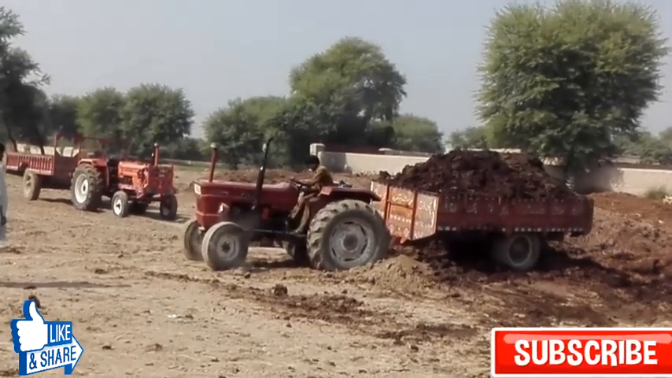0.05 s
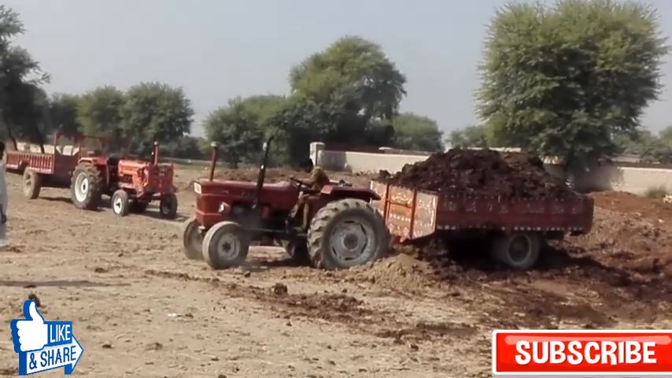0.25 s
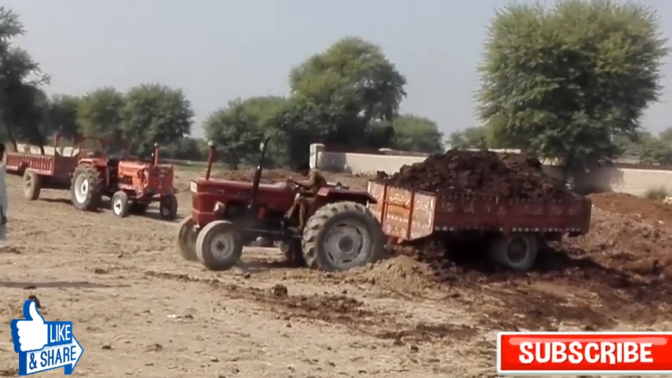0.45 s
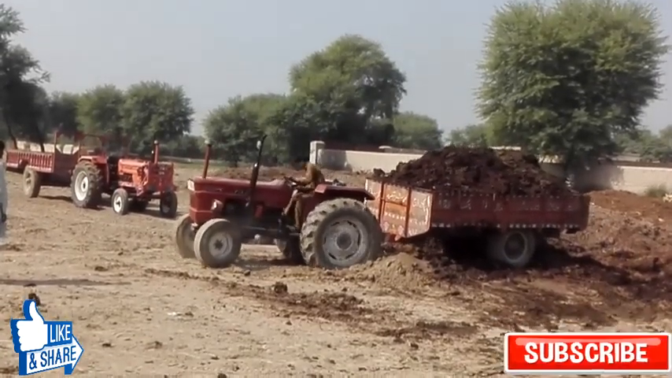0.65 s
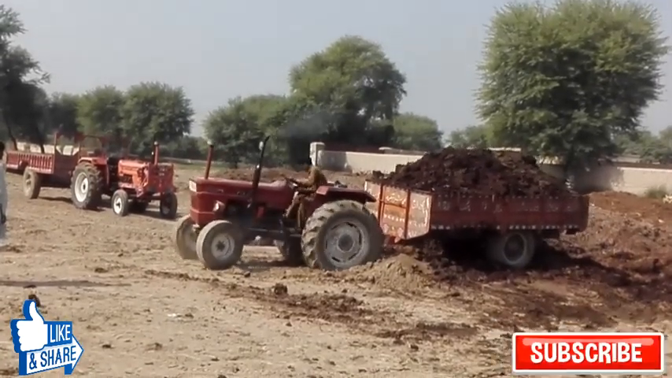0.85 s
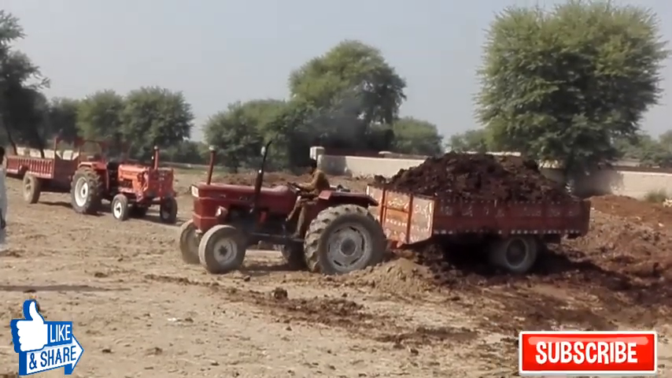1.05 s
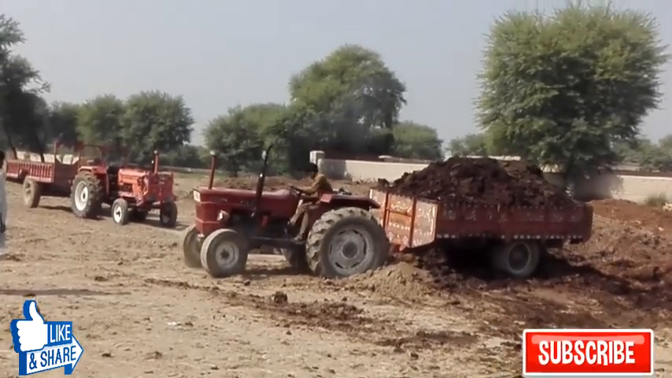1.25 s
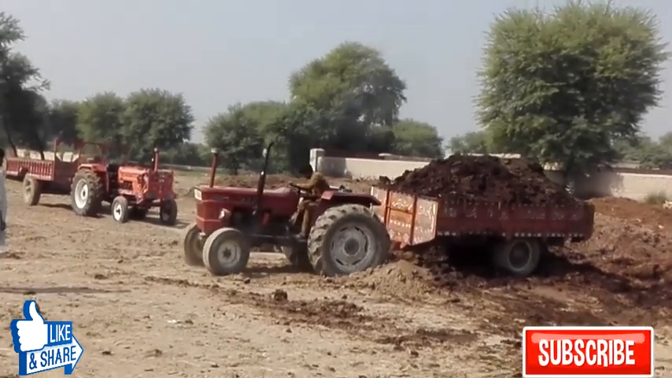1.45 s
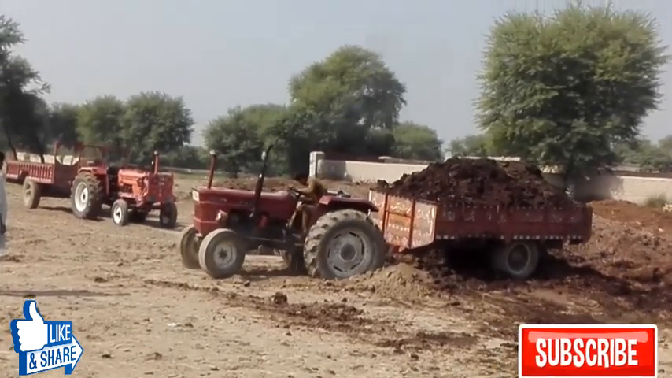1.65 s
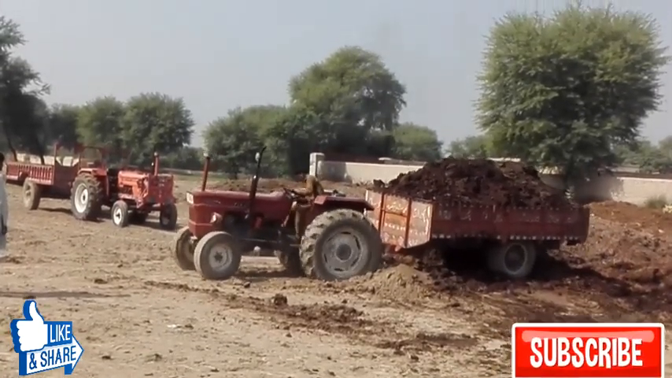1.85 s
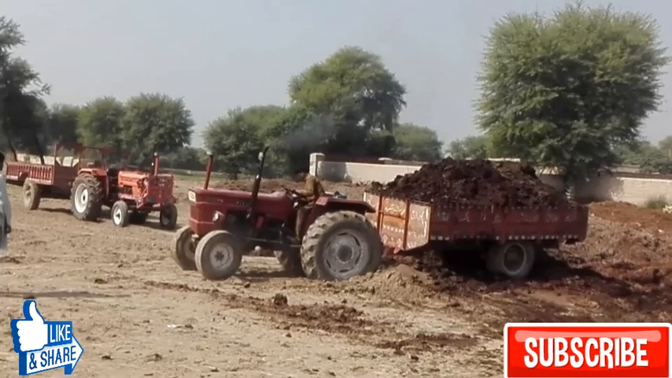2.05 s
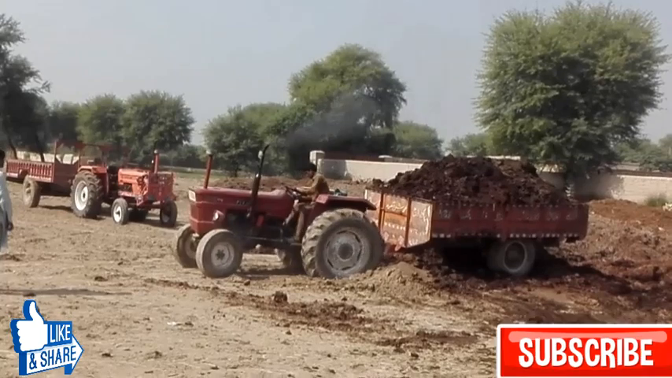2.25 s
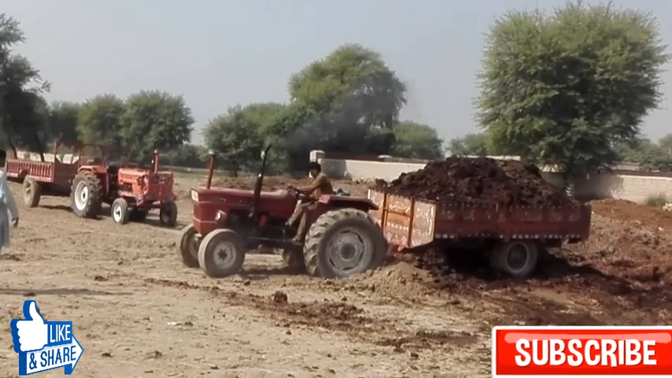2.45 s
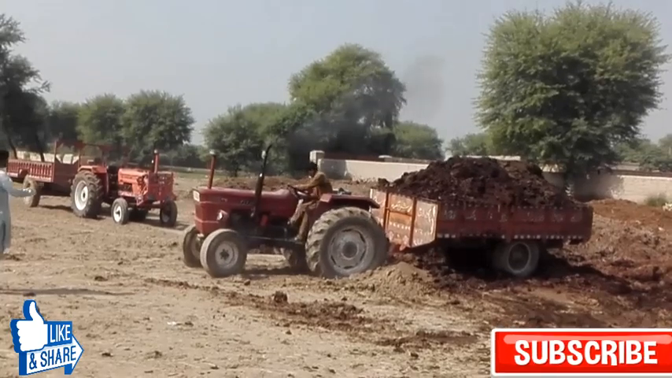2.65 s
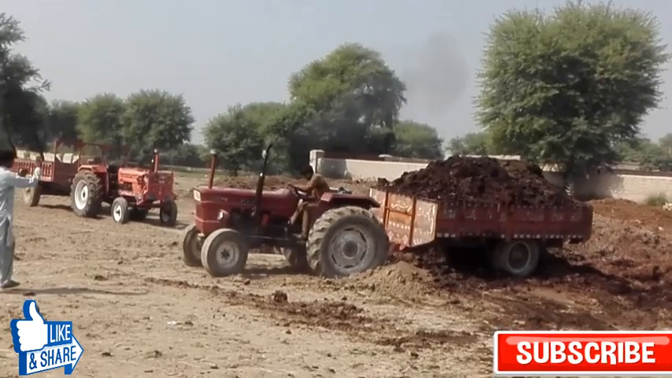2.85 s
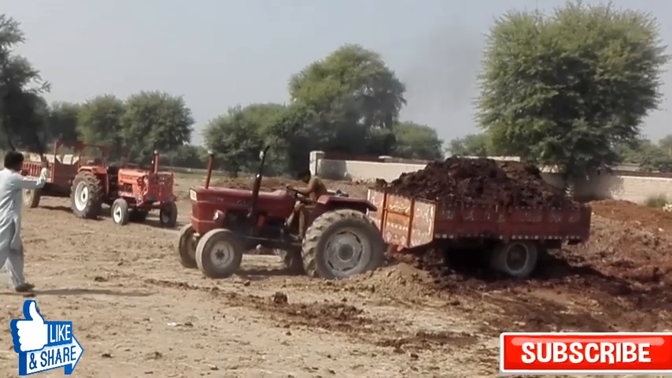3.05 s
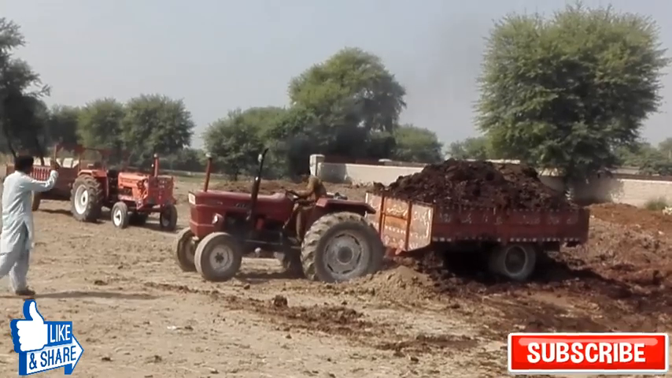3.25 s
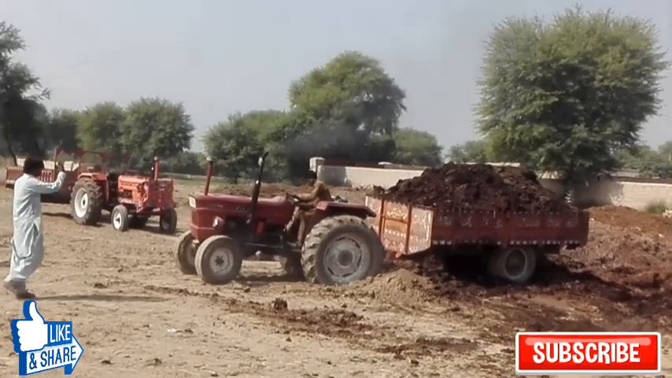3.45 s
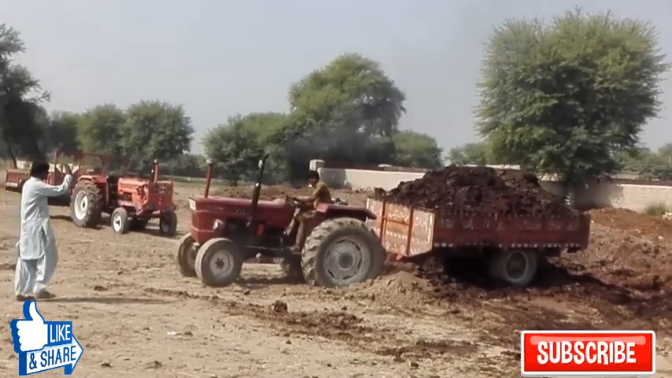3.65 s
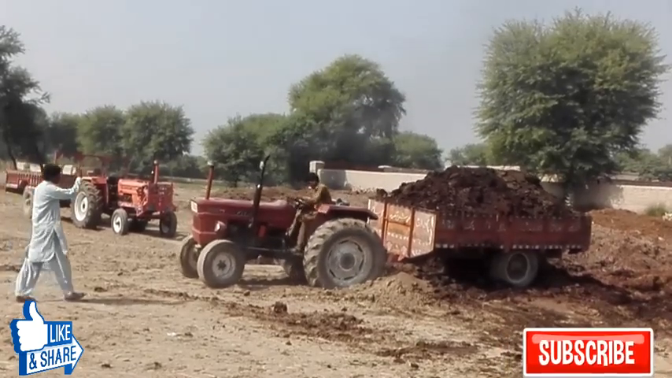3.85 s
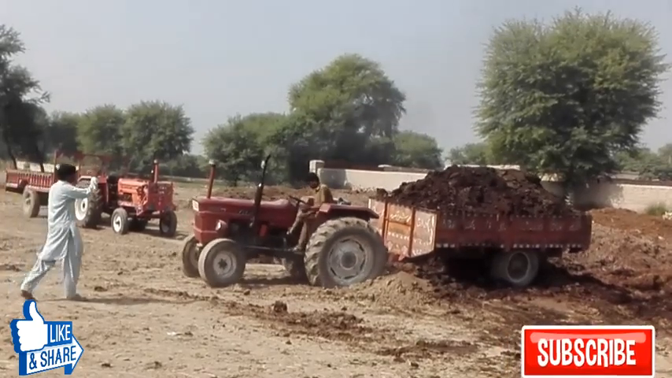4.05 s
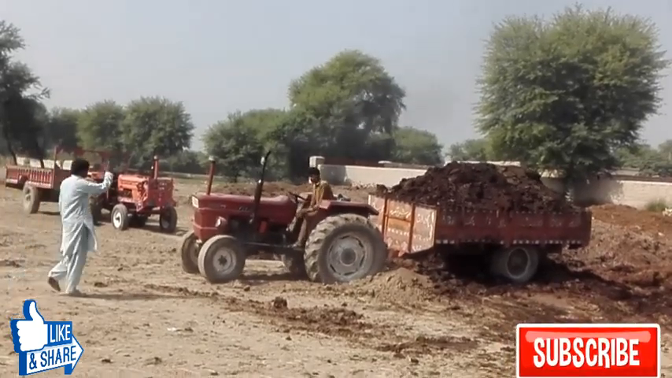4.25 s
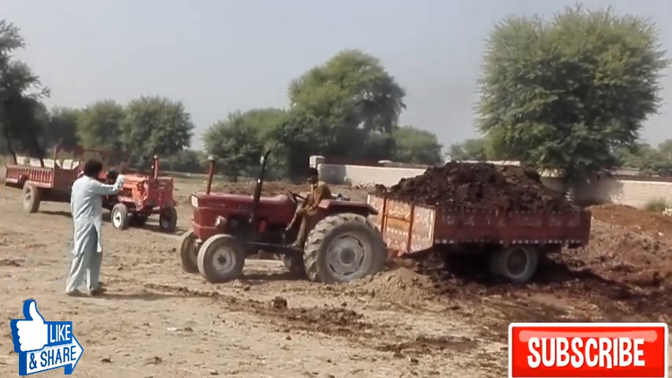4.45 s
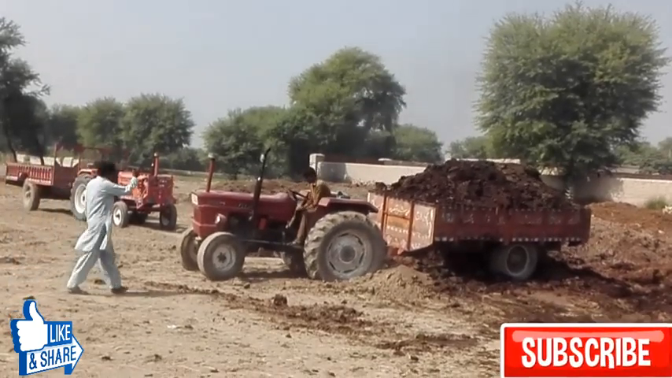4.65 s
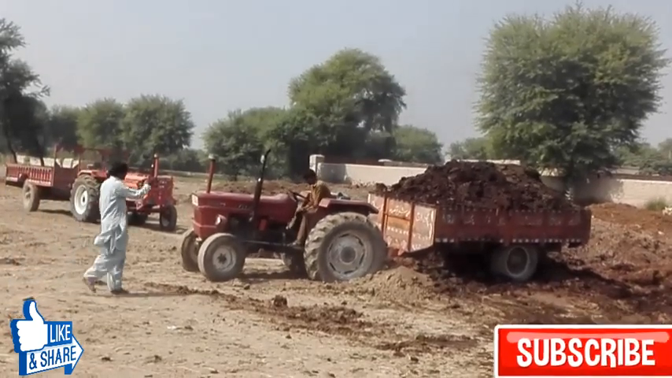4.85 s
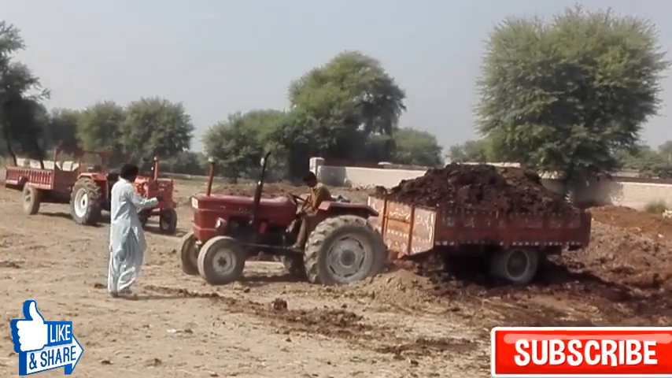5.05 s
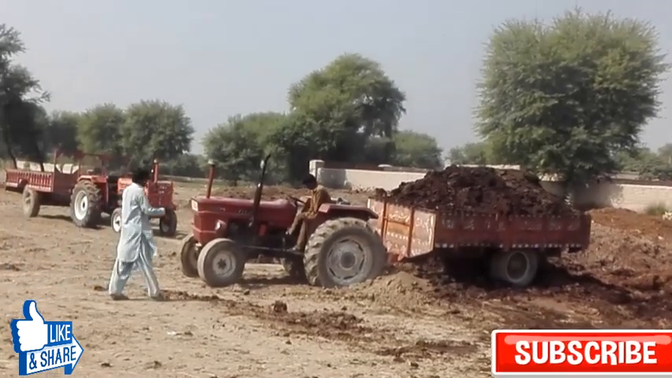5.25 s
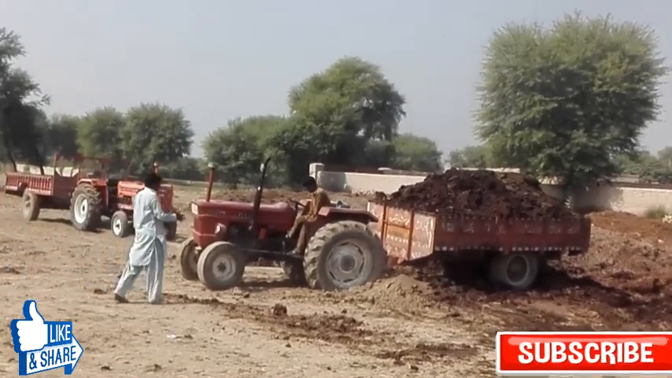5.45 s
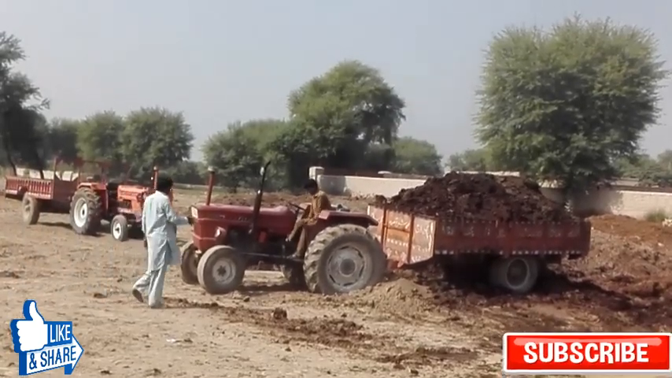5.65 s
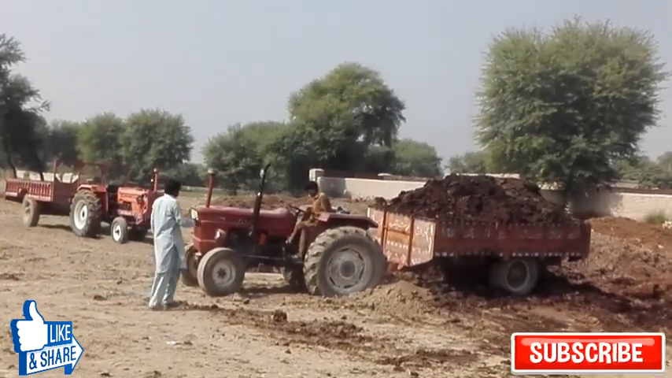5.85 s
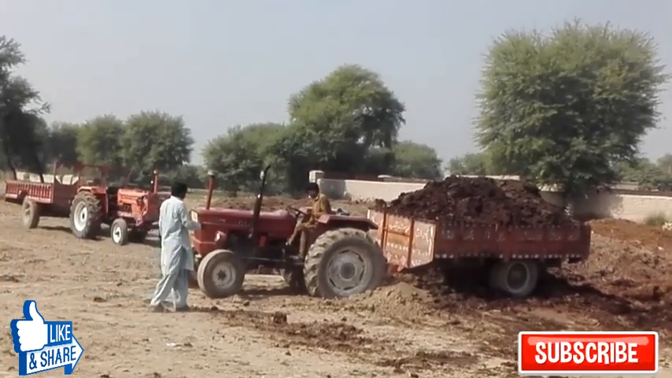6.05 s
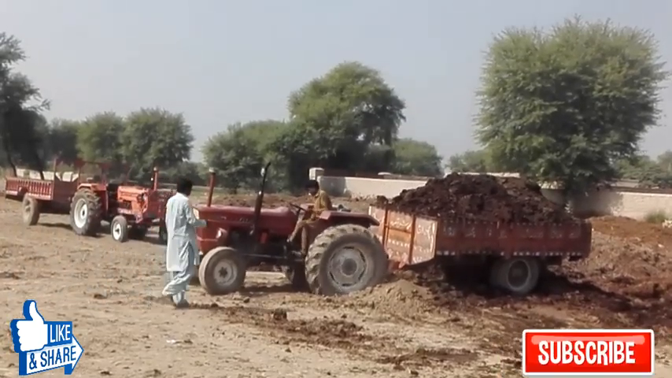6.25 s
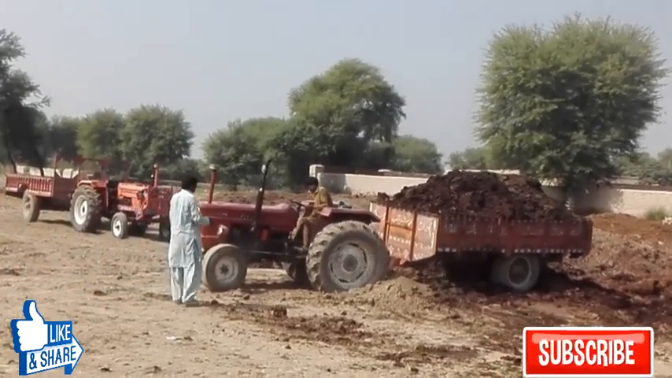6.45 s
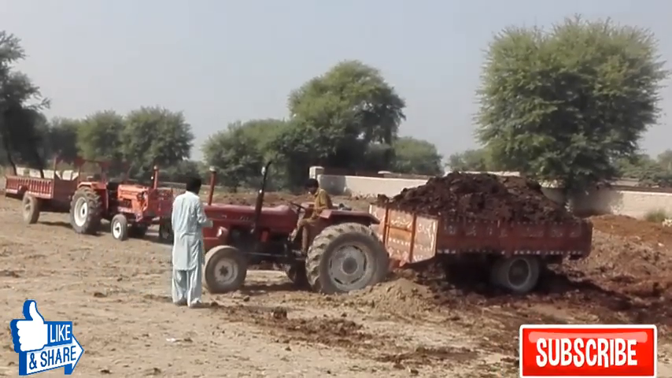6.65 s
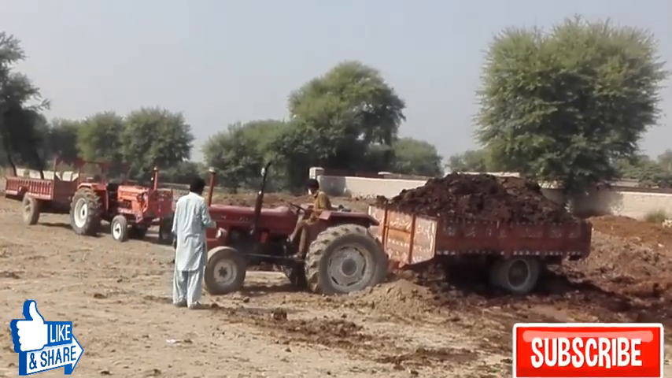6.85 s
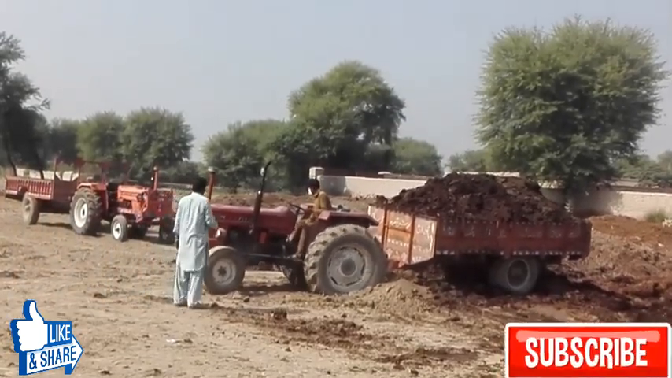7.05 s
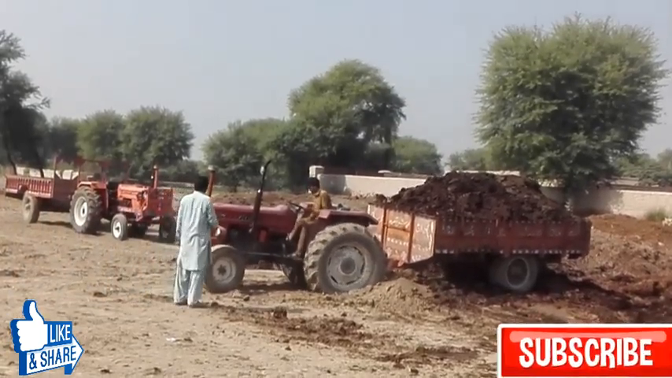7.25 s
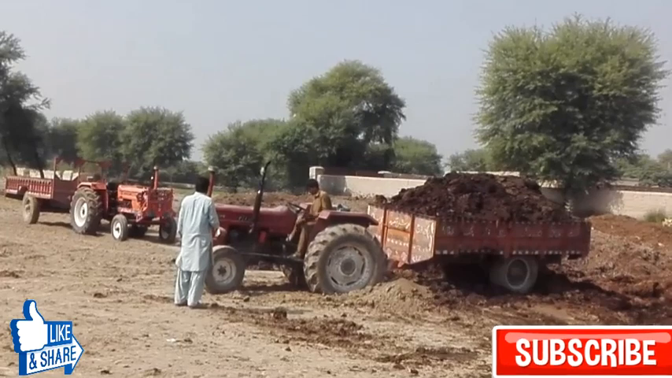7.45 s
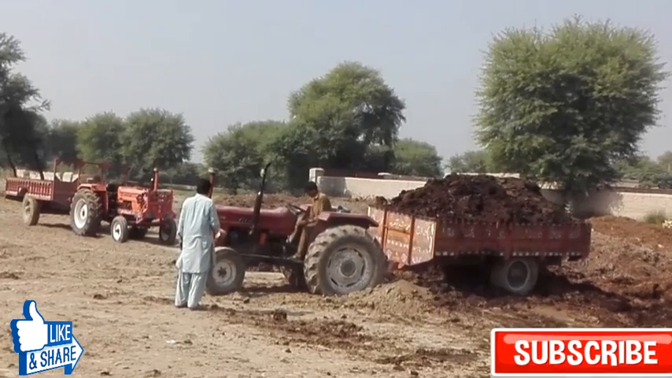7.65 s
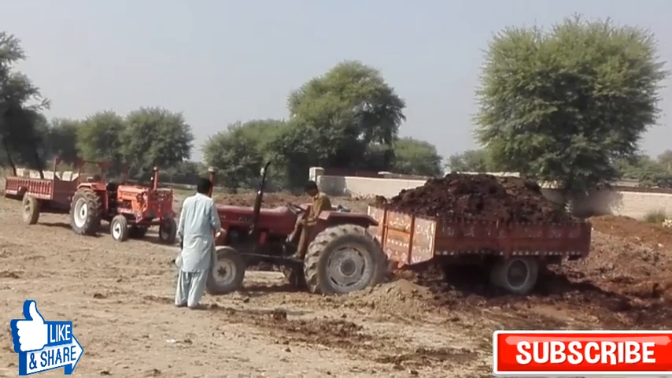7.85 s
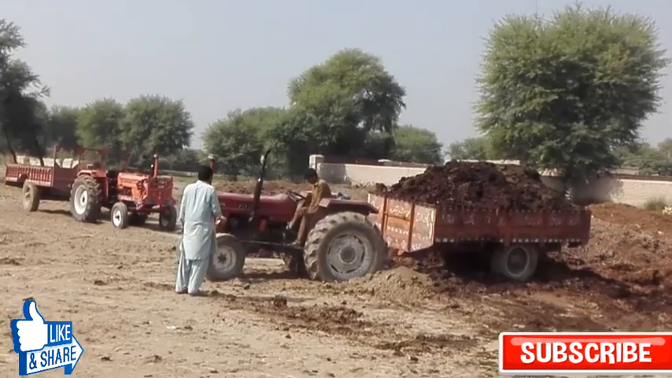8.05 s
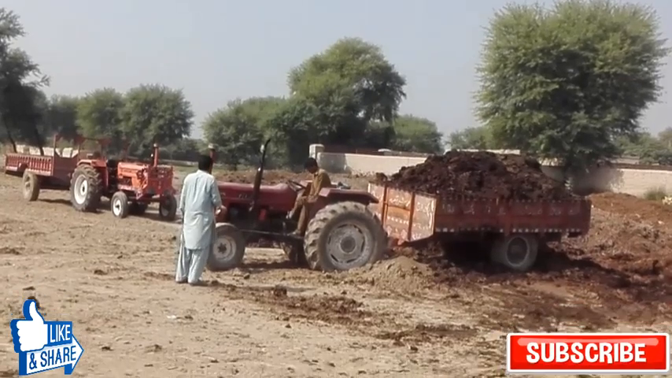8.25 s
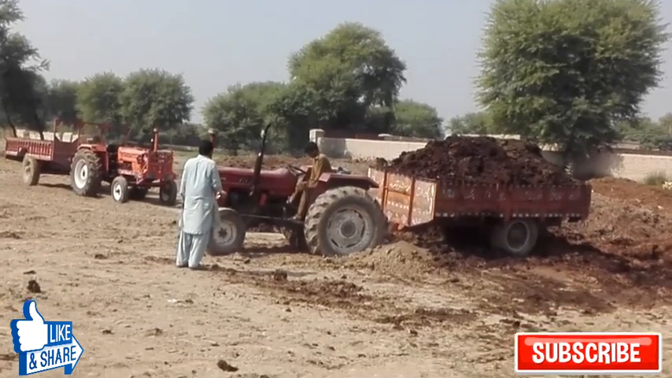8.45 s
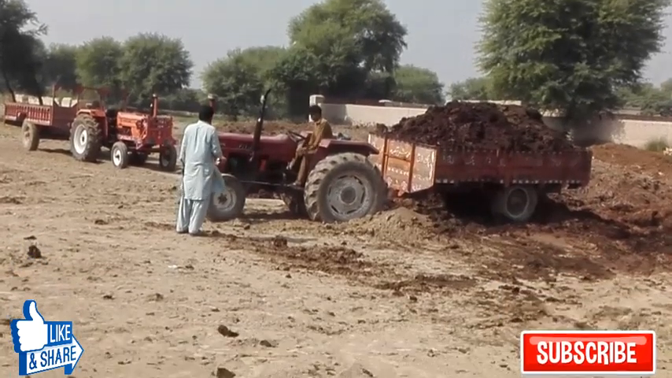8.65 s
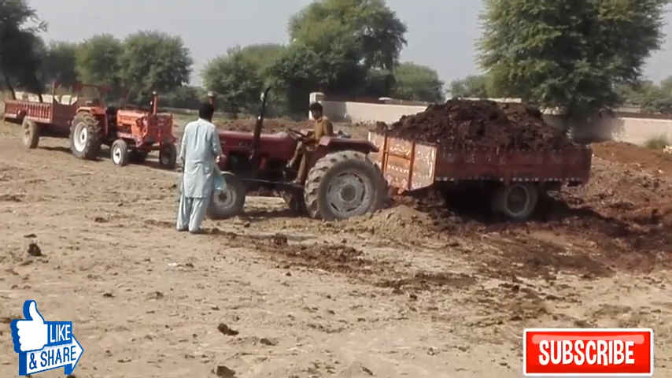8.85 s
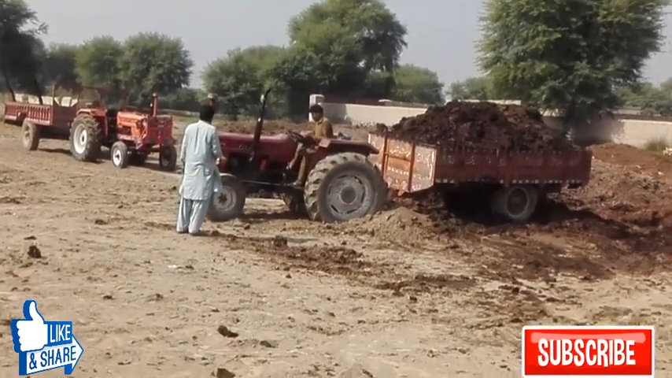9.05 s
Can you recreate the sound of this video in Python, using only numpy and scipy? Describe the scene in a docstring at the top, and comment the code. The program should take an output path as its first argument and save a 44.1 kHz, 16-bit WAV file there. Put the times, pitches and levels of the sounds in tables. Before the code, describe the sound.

A diesel tractor revs hard in repeated surges, its loaded trolley clanking and squeaking, then drops to a knocking idle.

```python
"""A four-cylinder diesel tractor in an open field strains at a loaded trolley stuck in soft ground.
First come three surges of throttle: knock, hiss and rumble grow with speed and fuel, while the
trolley clanks, thuds and squeaks. After each surge the engine slows and the exhaust pipe throbs as
the unfuelled cylinders suck. At about 6 s a fourth pull makes the gearbox whine. Then the engine
sinks to idle, and picks up a little at the end."""
import sys
import numpy as np
from scipy import signal
from scipy.fft import rfft, irfft
from scipy.io import wavfile
from scipy.ndimage import uniform_filter1d

SR = 44100
rng = np.random.default_rng(int(sys.argv[2]) if len(sys.argv) > 2 else 0)


def waveform_to_disk(signal):
    """Save audio, clipped to [-1, 1], as 16-bit WAV at the path in sys.argv[1]."""
    frames = np.transpose(np.atleast_2d(signal))
    scaled = np.clip(frames, -1, 1) * 32767
    samples = np.round(scaled).astype(np.int16)
    wavfile.write(sys.argv[1], SR, samples)


N = 401751
TIME = np.arange(N) / SR
CRUISE_HZ = 60  # firings per second at cruising speed
# How hard the cylinders knock. Each entry: one cylinder's level in dB.
CYLINDER_DB = [1, 0, -1, 0]


def engine(firings, hz, fuel):
    """Valves rattle the engine block; under load each firing barks, and at idle the pistons slap most."""
    # Tone colours of the block, the bark and the pipe's shrill ring. Each row: pitch in Hz, level in dB.
    block_colour = [(400, -23.5), (680, -20), (750, -9.5), (840, -9.5), (1000, -3), (1250, -5.5),
                    (1550, -1.5), (1820, -8), (2450, -3), (3200, -3), (4500, -16.5), (5300, -9.5),
                    (7000, -17.5), (14000, -50.5)]
    bark_colour = [(400, -2), (700, -14), (900, -18.5), (1350, -1), (1800, -10), (2120, -4.5), (2400, -2.5),
                   (3200, -3.5), (4500, -14), (8000, -20.5), (14000, -40)]
    shrill_colour = [(1700, -33), (2060, 1), (2180, 14), (2600, -61.5)]
    # How hard the pistons slap. Each entry: one piston's level in dB.
    piston_db = [0.5, 4, -2.5, 0.5]
    idle_fuel, hard_fuel = 0.119, 0.715  # the bark starts at the first and is full at the second
    load = np.clip((fuel - idle_fuel) / (hard_fuel - idle_fuel), 0, 1)
    idle = np.clip((46 - hz) / 5, 0, 1)
    racing = np.clip((hz - 55) / 20, 0, 1)
    clatter = unit(impacts(firings, count=72, scatter_db=4, slop=0.00296))
    slap_pulse = bursts(firings - .45, hz, piston_db, rise_s=0.00085, decay_s=0.0062, scatter_db=1.85)
    slap = (0.334 + 1.064 * idle) * slap_pulse * noise()
    shake = unit((1 - 0.136 * idle) * (clatter + noise()) + slap) * (1 - 0.616 * load)
    puff = bursts(firings, hz, CYLINDER_DB, rise_s=0.00074, decay_s=0.00746, scatter_db=1.95)
    blast = unit(puff * (noise() + 0.389 * clatter))
    block = undb(-2) * colour(shake, block_colour) + panels(shake + load * blast)
    bark = undb(-2.5) * load * colour(blast, bark_colour)
    whirr = racing * (1 - 0.7 * load) * fan_and_gears(firings)
    shrill = undb(-7.5) * load * racing * colour(blast, shrill_colour)
    knock_gain = effort(hz, fuel, cruise_db=-37, doubling_db=9.51, fuel_db=8.91)
    hiss_gain = effort(hz, fuel, cruise_db=-43, doubling_db=9.93, fuel_db=9.76)
    return knock_gain * (block + bark + whirr + shrill) + hiss_gain * hiss(puff, load, clatter, slap)


def exhaust(firings, hz, fuel):
    """The exhaust pipe throbs at the firing rate; unequal puffs ring it with a lumpy rumble."""
    # Weaker tones; unequal cylinders add the fractions. Each row: multiple of firing rate, level in dB.
    overtones = [(.5, -3), (.75, -29), (1.25, 5), (1.5, 0.5), (1.75, -16.5), (2.25, -35), (2.5, -5.5),
                 (2.75, -0.5), (3, 0.5), (3.75, -3), (4, 2.5), (8, -4)]
    # The pipe's tone colour. Each row: pitch in Hz, level in dB.
    pipe_colour = [(25, -16), (45, -4), (65, -3), (100, 2.5), (138, -3.5), (174, 2), (195, -4), (220, -2.5),
                   (255, -11), (300, -6.5), (400, -14), (550, -22), (630, -21), (900, -27.5), (1500, -47)]
    peak_delay = 0.2798  # the pressure peaks this share of the way to the next firing
    angle = 2 * np.pi * (firings - peak_delay + 0.0026 * wander(40))
    lumps = sum(undb(db + 3.63 * wander(6)) * np.sin(k * angle + 2 * np.pi * rng.random())
                for k, db in overtones)
    gust = unit(noise() * np.exp(-1.8 * (firings % 1)))  # each puff starts rough and eases off
    puffs = unit(impacts(firings, count=48, scatter_db=4, slop=0.0214)) + undb(-3) * gust
    rumble = undb(-4.5) * colour(lumps, pipe_colour) + undb(-1.5) * colour(puffs, pipe_colour)
    rumble_gain = effort(hz, fuel, cruise_db=-28.5, doubling_db=8.3, fuel_db=0.61)
    return throb(angle, hz, fuel) + rumble_gain * rumble


def throb(angle, hz, fuel):
    """Fuelled cylinders blow and unfuelled ones suck, so the throb dips as one gives way to the other."""
    # With fuel off, the flywheel drags the engine round. Each row: start and end in seconds.
    coasting_times = [(-0.1, 0.041), (1.07, 1.425), (2.34, 2.814), (3.65, 5.18), (6.88, 8.46)]
    # Suction in the pipe. Each row: firing rate in Hz, level of the tone in dB, of its octave in dB.
    suction = [(36.0, -43.5, -39.5), (41.9, -33, -37), (47.2, -31, -32.5), (62, -28, -35.5),
               (70.5, -22, -35), (79.5, -17.5, -33.5)]
    rates, *suction_db = np.transpose(suction)
    coasting = sum(gate(start, end, rise_s=0.096, fall_s=0.189) for start, end in coasting_times)
    spare_fuel = np.maximum(fuel - 0.0446, 0)  # with less fuel there is no pressure to spare
    build_s = 0.0232
    lag = np.exp(-1 / (build_s * SR))
    tone, octave = (-56.5, -19, 3), (-46.5, -25, -3.1)
    out = 0
    for k, (light_db, blow_db, doubling_db) in enumerate([tone, octave]):
        blow = spare_fuel * undb(blow_db + doubling_db * np.log2(hz / CRUISE_HZ))
        suck = undb(light_db) + coasting * undb(np.interp(hz, rates, suction_db[k]))
        swing = signal.lfilter([1 - lag], [1, -lag], blow - suck)
        out = out + swing * unit(np.cos((k + 1) * angle))
    return out * undb(0.9 * wander(35))


def hiss(puff, load, clatter, slap):
    """Rushing gas hisses, pulsing more with each firing as the load grows."""
    # The tone colour of the gas. Each row: pitch in Hz, level in dB.
    gas_colour = [(1000, -14.5), (2000, 3), (3500, 5.5), (4600, 0), (6000, 3), (7700, 2), (8500, -0.5),
                  (10500, 1.5), (12000, -0.5), (14500, -11.5)]
    pulsing = 0.071 + 0.602 * load
    gas = noise() * np.sqrt(1 - pulsing + pulsing * puff ** 2)
    return colour(gas + undb(-11) * clatter + 0.125 * slap, gas_colour)


def panels(shaking):
    """The shaken bonnet and cast metal parts ring at a few pitches."""
    # Each row: pitch in Hz, width in Hz, level in dB.
    rings = [(755.1, 30.9, -17.5), (1325.3, 137, -6.5), (1471.4, 83, -13), (1914, 20, -22.5),
             (2051, 39, -23), (3274, 84, -21), (3814, 73, -18)]
    return sum(undb(db) * unit(signal.lfilter(*signal.iirpeak(hz, hz / width, SR), shaking))
               for hz, width, db in rings)


def fan_and_gears(firings):
    """The fan and timing gears sing wavering tones that follow the engine's speed."""
    # Each row: multiple of the firing rate, level in dB.
    tones = [(8.05, -17), (12.5, -16.5), (16.1, -12), (18.75, -22)]
    return sum(undb(db + 2 * wander(6.5)) * unit(np.sin(2 * np.pi * k * firings + 0.67 * wander(45)))
               for k, db in tones)


def gearbox(firings):
    """Loaded gear teeth whine as they meet and rasp as they slide."""
    # The gearbox's loudness under load. Each row: time in seconds, level in dB.
    loudness = [(5.95, -79.5), (6.25, -39), (6.55, -35.5), (6.88, -36.5), (6.96, -50), (7.1, -76)]
    # The whine. Each row: multiple of the rate at which teeth meet, level in dB.
    tones = [(.5, -14.5), (1, 0.5), (2, -3)]
    teeth_per_firing = 22.3
    tooth_angle = 2 * np.pi * teeth_per_firing * firings + 0.47 * wander(70)
    whine = sum(undb(db + 0.7 * wander(35)) * np.sin(k * tooth_angle) for k, db in tones)
    rasp = colour(noise(), [(1500, -1.5), (2800, 1), (4000, -3.5), (7500, -9.5), (9000, -23)])
    return undb(np.interp(TIME, *np.transpose(loudness))) * (whine + undb(1.5) * rasp)


def hitch():
    """Steel slams on steel: a crash with a few ringing tones in it."""
    # Each row: start in seconds, level in dB, fading time in seconds.
    clanks = [(.673, -24.5, 0.0096), (1.003, -28, 0.0106), (1.83, -24.5, 0.0157), (1.85, -25, 0.013),
              (1.93, -28.5, 0.0142), (5.275, -41, 0.0215)]
    # The steel's ringing tones and the crash's tone colour. Each row: pitch in Hz, level in dB.
    steel_tones = [(3210, -4), (3740, -7), (5120, -11), (6070, -13), (8620, -15), (13800, -20)]
    crash_colour = [(400, -24), (1200, 6), (2200, -1.5), (3400, -5.5), (4500, 3), (6000, -3), (8500, -6.5),
                    (14000, -15)]
    rings = sum(undb(db + 1.8 * wander(120)) * np.sin(2 * np.pi * hz * TIME + .5 * wander(200))
                for hz, db in steel_tones)
    return blows(clanks, colour(noise(), crash_colour) + undb(-1.5) * unit(rings))


def trolley_thuds():
    """The jerked trolley's body gives dull thuds."""
    # Each row: start in seconds, level in dB, fading time in seconds.
    thuds = [(.68, -27.5, 0.0223), (1.695, -25.5, 0.136), (3.08, -27.5, 0.043)]
    # The body's tone colour. Each row: pitch in Hz, level in dB.
    body_colour = [(40, -2.5), (90, -5), (200, -4.5), (400, -7), (650, -11.5), (900, -20), (3000, -21.5)]
    return blows(thuds, colour(noise(), body_colour))


def squeaks():
    """Dry steel joints stick and slip in short, thin, stuttering squeaks."""
    # Each row: start and length in seconds, first and last pitch in Hz, level in dB.
    slips = [(0.322, 0.049, 12800, 12500, -50.5), (0.369, 0.028, 7900, 7830, -44.5),
             (.48, 0.052, 7850, 7960, -47.5), (0.579, 0.059, 9550, 9550, -44),
             (1.588, 0.075, 12950, 12320, -47.5), (1.646, 0.023, 7780, 7700, -36),
             (1.66, 0.1, 7830, 7900, -52.5), (3.18, .035, 6850, 6880, -47),
             (3.498, 0.079, 7650, 7700, -44.5), (4.58, 0.0344, 11870, 11220, -46.5)]
    out = np.zeros(N)
    waver = 1 + 0.0087 * wander(900)
    grip = undb(3.7 * wander(250))
    for start, length, first_hz, last_hz, db in slips:
        span = np.flatnonzero((TIME >= start) & (TIME < start + length))
        hz = np.linspace(first_hz, last_hz, len(span)) * waver[span]
        tone = np.sin(2 * np.pi * np.cumsum(hz) / SR)
        out[span] += undb(db) * unit(np.hanning(len(span)) * grip[span] * tone)
    return out


def engine_speed():
    """Firings per second, gliding from one turning point to the next."""
    # Each row: time in seconds, firing rate in Hz.
    turning_points = [(0.0, 63.9), (0.2, 65.8), (0.5, 60.0), (1.08, 82.9), (1.69, 64.5), (2.38, 85.7),
                      (3.1, 64.5), (3.66, 86.1), (5.34, 43.9), (5.7, 43.2), (6.03, 63.2), (6.41, 63.7),
                      (6.91, 68.9), (6.97, 64.8), (8.37, 35.9), (8.58, 39.7), (9.11, 43.9)]
    times, hz = np.transpose(turning_points)
    return np.exp(np.interp(TIME, times, np.log(hz)))


def throttle():
    """The driver feeds fuel in surges, and the engine's speed regulator in small doses."""
    # Each row: start, end and opening time in seconds, fuel from 0 to 1.
    feeds = [(0.367, 0.7, 0.063, 0.4), (0.413, 0.946, 0.142, 0.53), (1.603, 1.92, 0.076, 0.32),
             (1.84, 2.292, 0.048, 0.47), (2.968, 3.3, 0.05, 0.31), (3.144, 3.592, 0.137, 0.48),
             (5.216, 5.739, 0.063, 0.2), (5.742, 5.944, 0.017, 0.78), (5.96, 6.3, 0.02, 0.2),
             (6.144, 6.794, 0.102, 0.19), (8.223, 9.054, 0.074, 0.17), (9.051, 9.2, 0.031, 0.97)]
    return np.max([fuel * gate(start, end, opening, fall_s=0.0896)
                   for start, end, opening, fuel in feeds], axis=0)


def effort(hz, fuel, cruise_db, doubling_db, fuel_db):
    """A gain that rises by doubling_db when the speed doubles and by fuel_db at full fuel."""
    return undb(cruise_db + doubling_db * np.log2(hz / CRUISE_HZ) + fuel_db * fuel)


def impacts(firings, count, scatter_db, slop):
    """A pattern of clicks that repeats every four firings, each time a little differently."""
    cycle = len(CYLINDER_DB)
    pattern = (np.arange(count) + rng.random(count)) * cycle / count
    signs = rng.choice([-1, 1], count)
    chance = rng.standard_normal((N // 2000, 2, count))
    when = cycle * np.arange(len(chance))[:, None] + pattern + slop * chance[:, 0]  # in firings
    heard = (when > 0) & (when < firings[-2])
    place = np.interp(when[heard], firings, np.arange(N))
    force = (signs * undb(scatter_db * chance[:, 1]))[heard]
    i, part = place.astype(int), place % 1  # two neighbouring samples share each click
    return np.bincount(i, force * (1 - part), N) + np.bincount(i + 1, force * part, N + 1)[:N]


def bursts(firings, hz, cylinder_db, rise_s, decay_s, scatter_db):
    """A level that leaps at each firing, by cylinder and by chance, and dies away."""
    k = np.floor(firings).astype(int)
    db = np.take(cylinder_db, k, mode="wrap") + scatter_db * rng.standard_normal(N // 100)[k]
    age = (firings % 1) / hz
    return unit(undb(db) * (1 - np.exp(-age / rise_s)) * np.exp(-age / decay_s))


def blows(table, ring):
    """Each blow starts the ring at once and lets it die away."""
    return ring * sum(undb(db) * (TIME >= start) * np.exp(-np.abs(TIME - start) / decay)
                      for start, db, decay in table)


def colour(x, points, size=8192):
    """Ring x through a body with this tone colour (rows of Hz, dB); the result has strength 1."""
    hz, db = np.transpose(points)
    log_hz = np.log(np.maximum(np.fft.rfftfreq(size, 1 / SR), 1))
    beyond_ends = np.abs(log_hz - np.clip(log_hz, np.log(hz[0]), np.log(hz[-1])))
    db = np.interp(log_hz, np.log(hz), db) - 20 * beyond_ends
    cepstrum = irfft(np.log(undb(db)))
    cepstrum[1:size // 2] *= 2  # folding it forward makes the ring follow the hit, never lead it
    cepstrum[size // 2 + 1:] = 0
    ring = irfft(np.exp(rfft(cepstrum)))
    return unit(signal.fftconvolve(x, ring)[:N])


def gate(start, end, rise_s, fall_s):
    """Ramp up from the start, hold, ramp down after the end."""
    return np.clip((TIME - start) / rise_s, 0, 1) * np.clip((end - TIME) / fall_s + 1, 0, 1)


def wander(rate):
    """Glide to a new random value, rate times a second."""
    hold = int(SR / rate)
    steps = np.repeat(rng.standard_normal(N // hold + 1), hold)
    return unit(uniform_filter1d(steps, hold)[:N])


def noise():
    """White noise."""
    return rng.standard_normal(N)


def undb(db):
    """Turn decibels into a gain."""
    return 10 ** (np.asarray(db) / 20)


def unit(x):
    """Scale to an average strength (rms) of 1."""
    return x / np.sqrt(np.mean(x ** 2) + 1e-18)


def scene():
    """One turning shaft times every tractor sound; the trolley's noises are added on top."""
    hz, fuel = engine_speed(), throttle()
    firings = np.cumsum(hz) / SR  # how many firings have passed so far
    tractor = exhaust(firings, hz, fuel) + engine(firings, hz, fuel) + gearbox(firings)
    trolley = hitch() + trolley_thuds() + squeaks()
    return (tractor + trolley)[None]


def record(dry):
    """Cut away the highest treble."""
    top_hz = 14400
    return signal.sosfilt(signal.ellip(12, .1, 80, top_hz, fs=SR, output="sos"), dry)


dry = scene()
out = record(dry)
waveform_to_disk(out)
```